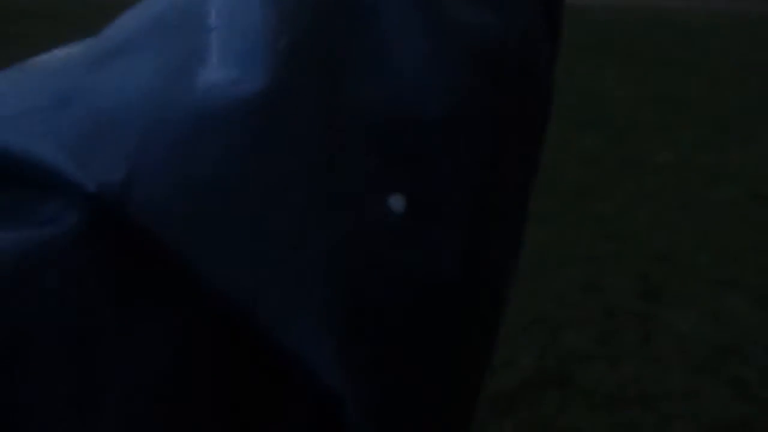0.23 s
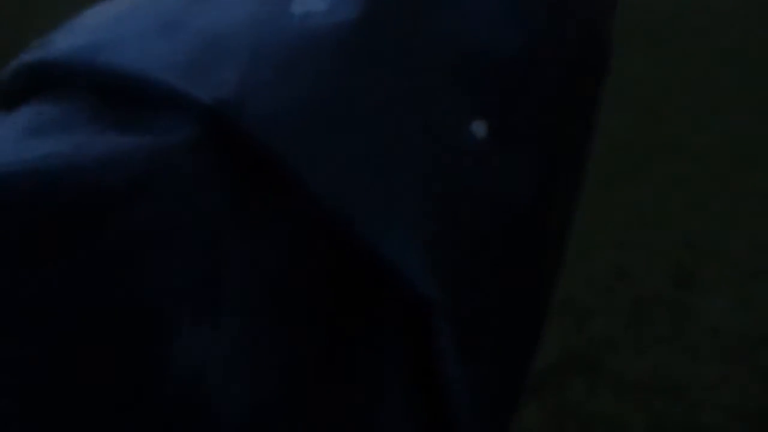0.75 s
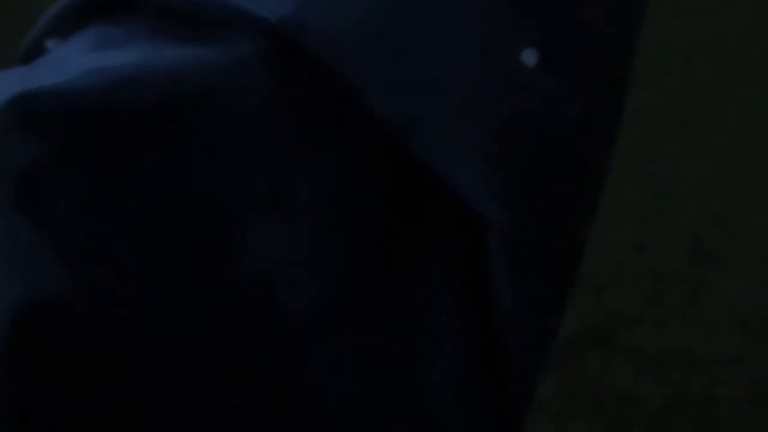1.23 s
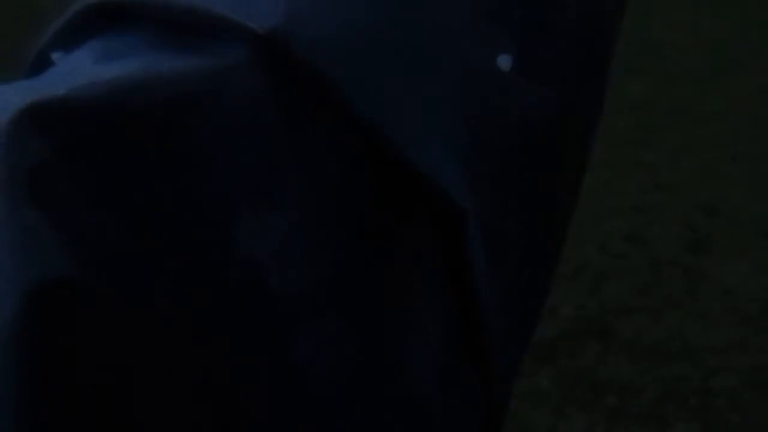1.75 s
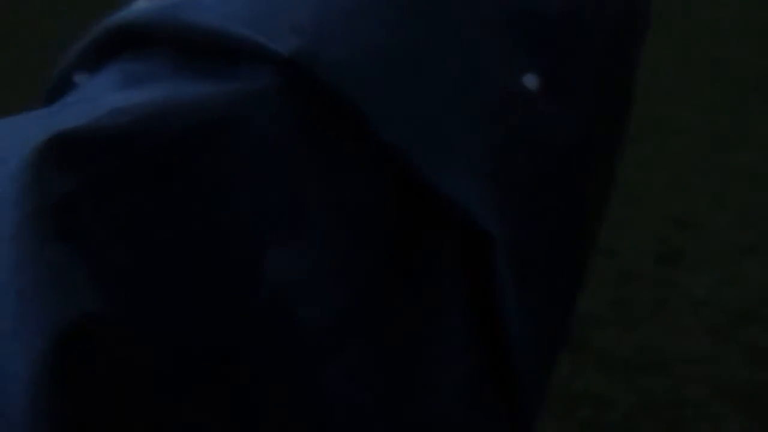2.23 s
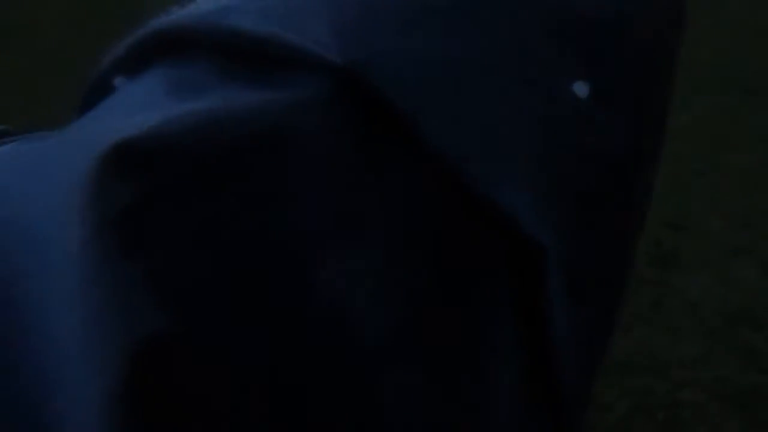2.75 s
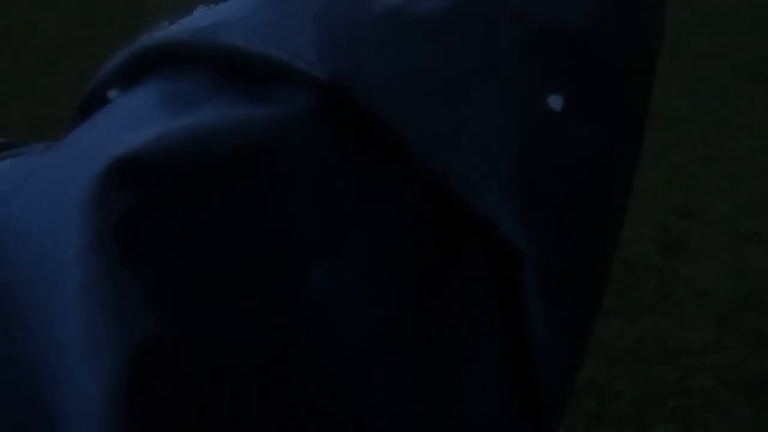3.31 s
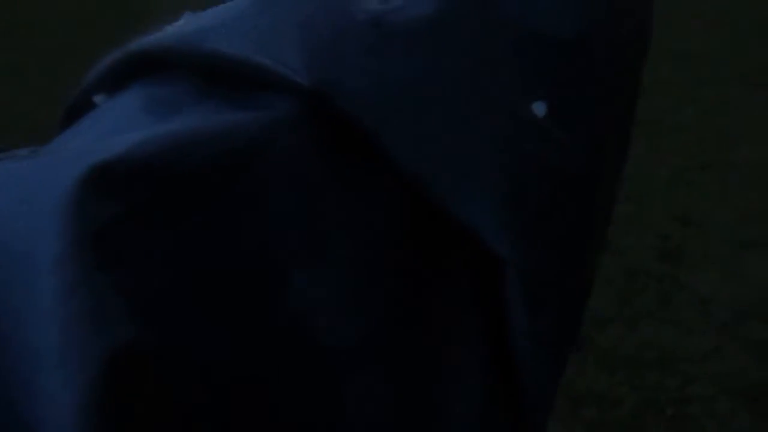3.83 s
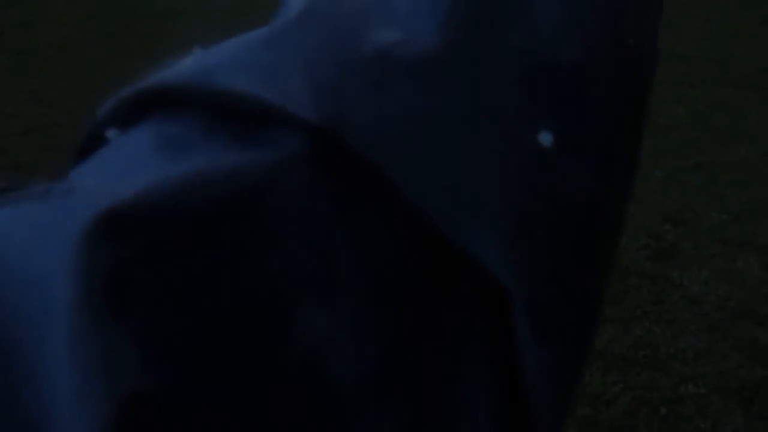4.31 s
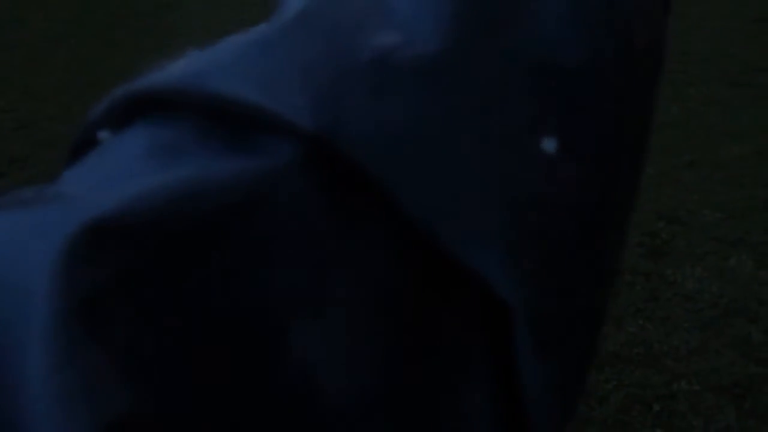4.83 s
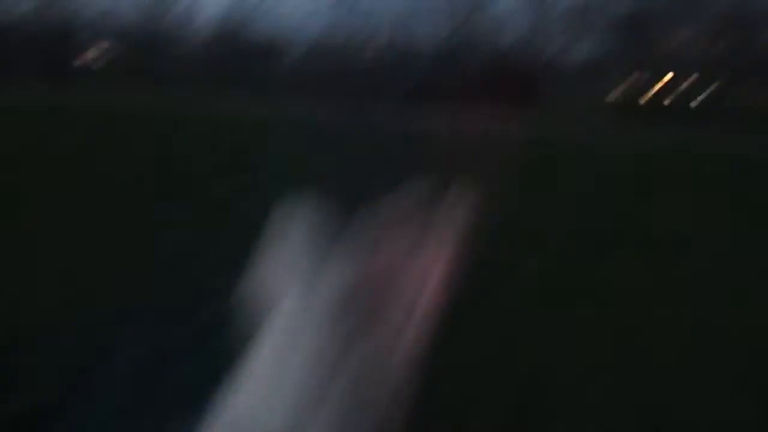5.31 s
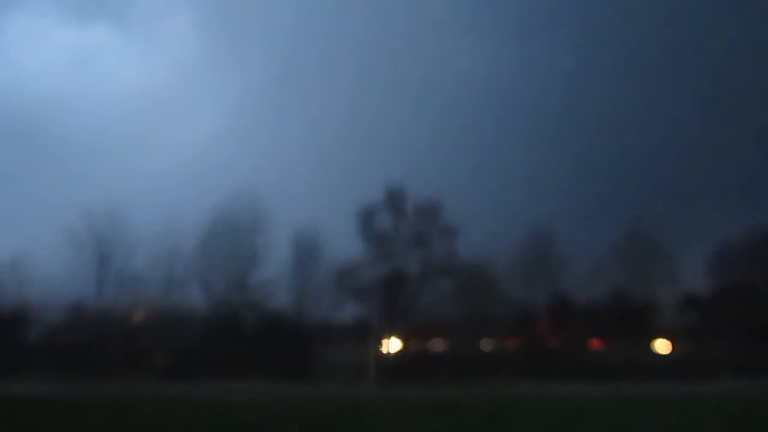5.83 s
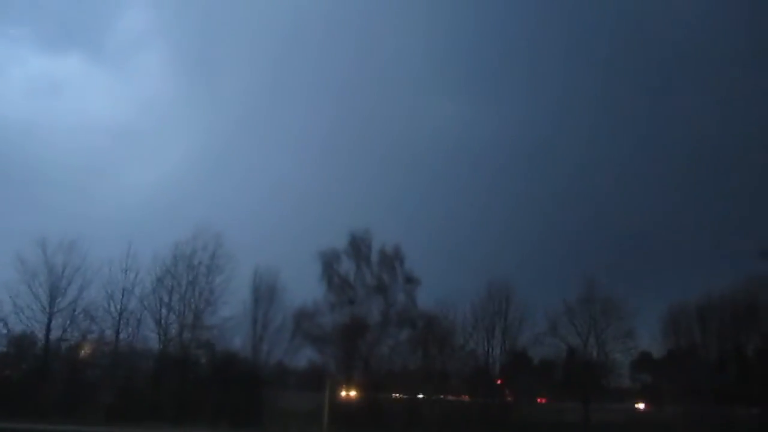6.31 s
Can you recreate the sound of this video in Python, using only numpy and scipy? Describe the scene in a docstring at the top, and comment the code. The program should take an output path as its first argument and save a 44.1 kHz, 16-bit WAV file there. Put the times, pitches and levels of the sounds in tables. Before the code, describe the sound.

Outdoors at dusk in an open field, hail and rain strike a jacket beside a handheld camera's stereo microphone. Soft taps patter irregularly; a few very loud, dry cracks stand out, one early, a tight cluster midway, another later. Beneath lie a faint rain hiss, low wind bumps and a tiny fast lens-motor ticking. The end is sparser.

```python
"""Hail clicks sharply on a jacket right beside a camera, over hissing rain, soft patter and gusty wind.
Each stone sets the cloth ringing briefly, with a noisy crack and a low thump; some also shake the camera.
Rain is coloured noise, wind is slow noise that pushes mostly opposite ways at the two microphone ports,
and a small lens motor knocks twice in each round, about ten rounds a second."""
import sys
import numpy as np
from scipy import signal
from scipy.fft import rfft, irfft
from scipy.io import wavfile
from scipy.ndimage import uniform_filter1d

SR = 44100
rng = np.random.default_rng(int(sys.argv[2]) if len(sys.argv) > 2 else 0)


def bounce(signal):
    """Save signal as a 16-bit WAV file at the path given by the first command-line argument."""
    frames = np.transpose(np.atleast_2d(signal))
    limited = np.clip(frames, -1, 1)
    pcm = np.round(limited * 32767).astype(np.int16)
    wavfile.write(sys.argv[1], SR, pcm)


N = 289560  # length [samples]


def undb(db):
    """Turn a level in dB into a gain."""
    return 10 ** (np.asarray(db) / 20)


def curve(table):
    """Draw straight lines between the rows of a timed table, giving each column one value a sample."""
    time_s, *columns = np.transpose(table)
    return [np.interp(np.arange(N) / SR, time_s, column) for column in columns]


def band(x, lo_hz, hi_hz, order=2):
    """Keep mainly the pitches between two limits."""
    sos = signal.butter(order, [lo_hz, hi_hz], "band", fs=SR, output="sos")
    return signal.sosfilt(sos, x)


def unit(x):
    """Scale to an average strength (rms) of 1."""
    return x / np.sqrt(np.mean(x ** 2))


def walk(rate_hz):
    """Random levels that slide from one to the next, rate_hz of them a second, with a spread of about 1."""
    hold = int(SR / rate_hz)
    steps = np.repeat(rng.standard_normal(N // hold + 1), hold)
    return unit(uniform_filter1d(steps, hold)[:N])


def ring(t, hz, db, t60, phase=0):
    """Sine waves that die away, one row for each way the object vibrates; t60 is the time to fall 60 dB."""
    hz, db, t60, phase = (np.reshape(v, (-1, 1)) for v in (hz, db, t60, phase))
    return undb(db) * np.sin(2 * np.pi * hz * t + phase) * 1000. ** (-t / t60)


def add(out, s, sound):
    """Mix a short sound into out, starting at s seconds."""
    i = int(s * SR)
    out[:, i:i + sound.shape[1]] += sound[:, :N - i]


def rain(level_db):
    """Far drops are so dense that they blur into a hiss, partly shared by the two ports."""
    # colour of the hiss at the right port, before a bass cut: (pitch [Hz], relative level [dB])
    colour = [(200, -30), (400, -20), (850, -4), (1150, -5), (1600, 0), (2200, -9.5), (3200, -11.5),
              (4100, -20.5), (5300, -18), (7500, -23.5), (10000, -32), (12500, -42), (14000, -52.5)]
    # how the ports share it: (pitch [Hz], left minus right [dB], likeness [0-1], left leads by [radians])
    sharing = [(300.3, 1.5, 0.8, 18), (800, 2.5, 0.5, 4.9), (1350, -4, .55, 2.5), (3040, -4, .25, 1.4),
               (5000, -1, 1, 4.9)]
    hz = np.arange(N // 2 + 1) * SR / N + 1  # the +1 keeps the logarithm finite
    db, pan_db, alike, lead = (np.interp(np.log(hz), np.log(table[0]), column)
                               for table in (np.transpose(colour), np.transpose(sharing))
                               for column in table[1:])
    alike = np.clip(alike, 0, 1)
    unsteady = undb(.8 * walk(30))
    right, other = rfft(rng.standard_normal((2, N)) * unsteady)
    left = alike * np.exp(1j * lead) * right + np.sqrt(1 - alike ** 2) * other
    left = left * undb(pan_db)
    bass_cut = np.minimum(hz / 200, 1)
    hiss = irfft(np.array([left, right]) * undb(db) * bass_cut, N)
    return unit(hiss) * undb(level_db)


def wind():
    """Eddies rumble, flutter and bump at the ports, mostly pushing one while they pull the other."""
    # strength before the random gusts below: (time [s], rumble level [dB], flutter level [dB])
    gusts = [(0, -74, -71.5), (.3, -90, -62.5), (.58, -78, -63.5), (.8, -84, -72), (1.1, -68, -68),
             (1.22, -97.5, -77.5), (1.54, -66, -76), (1.72, -84.5, -74), (1.96, -61.5, -92),
             (2.1, -84, -61), (3.05, -79.5, -63), (3.2, -78, -82), (3.42, -52.5, -49.5), (3.75, -78, -66.5),
             (4.06, -84, -86.5), (4.3, -69, -87), (5.1, -57, -66), (5.62, -88, -88), (6.1, -59, -78.5),
             (6.33, -62, -73.5), (6.57, -50, -71.5)]
    # single eddies: (time [s], peak level before the port gains [dB], middle pitch [Hz])
    puffs = [(0.21, -59.5, 300), (0.361, -61.5, 420), (0.445, -59, 354), (0.601, -69, 218),
             (0.85, -70, 237), (1.075, -65, 131), (1.998, -64, 158), (2.12, -71, 339), (2.405, -60, 261),
             (2.46, -54, 312), (2.621, -60, 420), (2.77, -56.5, 218), (2.858, -66, 280), (3.024, -58, 260),
             (3.089, -57, 324), (3.407, -51, 350), (3.759, -63, 385), (3.987, -60.5, 311.4),
             (6.248, -60.5, 253.2), (6.49, -50, 88.8)]
    rise_s, port_gains = 0.0085, [[-3], [4.88]]
    out = 0
    for db, lo_hz, hi_hz in zip(curve(gusts), (40, 150), (160, 420)):
        shared, own = unit(band(rng.standard_normal((2, N)), lo_hz, hi_hz))
        bumps_db = 5.0 * walk(45) + 3.0 * walk(12)
        out = out + undb(db + bumps_db) * np.array([-.75 * shared + .2 * own, shared])
    age = np.arange(3000) / SR / rise_s
    for s, peak_db, hz in puffs:
        bump = band(rng.standard_normal(len(age)), .7 * hz, 1.4 * hz) * age * np.exp(-age)
        add(out, s, undb(peak_db) * bump / abs(bump).max() * port_gains)
    return out


def motor(level_db):
    """The lens motor knocks twice a round; the casing rings and carries each knock to both ports."""
    # loudness on top of level_db: (time [s], first tick level [dB], second tick level [dB])
    ticks = [(0, 12, 11), (1, 21.5, 0), (2, 20.5, 8), (3.4, 22.5, 2), (4, 16, -6.5), (5.25, 17, -2.5),
             (5.4, -11.5, -5.5), (5.7, -6.5, 14), (6.57, -10, 16)]
    # ringing of the casing: (pitch [Hz], level [dB], t60 [s], left leads by [radians])
    casing = [(860, 3.5, 0.045, 3.1), (470, -11.5, 0.0097, 1), (1150, 4, .011, 2.2), (1390, -1, .008, 1.6)]
    round_s, first_s, second_s = .1001, .0945, .0275  # time between rounds, start of each tick series
    out, t = np.zeros((2, N)), np.arange(1500) / SR
    hz, db, t60, lead = np.transpose(casing)
    soft_start = 1 - np.exp(-t / 0.00094)
    for start, tick_db in zip((first_s, second_s), curve(ticks)):
        for s in np.arange(start, N / SR - .01, round_s):
            chance = rng.standard_normal((2, len(hz)))  # no two knocks are quite alike
            modes = hz * (1 + .015 * chance[0]), db + 2.5 * chance[1], t60
            left, right = ring(t, *modes, lead).sum(0), 1.2 * ring(t, *modes).sum(0)
            add(out, s, undb(tick_db[int(s * SR)]) * soft_start * np.array([left, right]))
    return out * undb(level_db)


def patter(level_db, count=480, size=80):
    """Raindrops tap the cloth softly: some at set times, fainter ones at random on a stock of random folds."""
    # drops that stand out: (time [s], level of the tap [dB], middle of the ring [Hz])
    drops = [(.071, -39, 1450), (0.11, -36, 1710), (0.168, -42, 1320), (0.208, -44, 1240),
             (.396, -42, 1410), (0.4258, -37, 1430), (.477, -38, 1300), (.542, -39, 1530),
             (.617, -37.5, 1560), (.704, -45, 1080), (1.026, -36, 1240), (1.064, -44, 1530),
             (1.13, -36.5, 1310), (1.156, -44, 900), (1.2353, -33.5, 1380), (1.254, -39, 1940),
             (1.276, -44, 1250), (1.388, -36, 1700), (1.5267, -34.5, 1400), (1.613, -40.5, 1570),
             (1.857, -39.5, 1610), (1.8848, -42, 1630), (1.951, -37.5, 1550), (1.969, -37, 1640),
             (2.034, -42, 1510), (2.047, -41.5, 1520), (2.1062, -36, 1110), (2.2473, -43, 1500),
             (2.33, -41.5, 1250), (2.373, -35, 1530), (2.517, -39, 1360), (2.529, -33.5, 1390),
             (2.7062, -36, 1470), (2.856, -33.5, 1400), (2.876, -37, 1510), (2.895, -38.5, 1410),
             (3.045, -42, 1360), (3.14, -44, 1600), (3.355, -39, 1470), (3.729, -46, 1720),
             (3.777, -41, 1610), (3.969, -46, 1640), (4.015, -44.5, 1128), (4.449, -44, 1256),
             (4.656, -42, 1370), (4.769, -44, 1660), (4.89, -48.5, 1900), (4.904, -45.5, 1440),
             (5.052, -46, 1330), (5.164, -42.5, 1000), (5.232, -42.5, 1780), (5.3195, -38, 1630),
             (5.468, -43, 1260), (5.448, -50, 1700), (5.886, -43.5, 1385), (6.1846, -57, 3000),
             (6.543, -45, 1275)]
    out = np.zeros((2, N))
    for s, peak_db, centre_hz in drops:
        add(out, s, undb(peak_db) * blow(centre_hz, -27.5, 10.9, -9.0))
    folds = [blow(1000 * 2 ** (0.88 * pitch), -26.5, 4 + 9 * length, -4.5)
             for pitch, length in rng.random((size, 2))]
    for when, luck, which in rng.random((count, 3)):
        drop_db = level_db[int(when * N)] + 13.5 - 1.9 * np.log(luck)  # a few drops are much louder
        add(out, when * N / SR, undb(drop_db) * folds[int(which * size)])
    return out


def thump(t):
    """A low knock made of two short rings, opposite at the two ports."""
    knock = ring(t, [130, 240], [-2, 0], [.02, .013]).sum(0)
    return band(knock, 120, 510) * [[-.75], [1]]


def blow(centre_hz, crack_db, t60_ms, pan_db):
    """A hit rings the cloth, cracks and thumps; the cloth's ring reaches the left port late and reversed."""
    # ways the cloth can ring: (pitch [Hz], level [dB], share of the limited ring time [ratio])
    cloth = [(521.8, -16, 0.43), (840, -11, 2.2), (1374, -2, 1.6), (1630, 5, 1.3), (2024, 10.5, 0.52),
             (2877, 6.5, 1.6), (5120, -14, 0.74)]
    t = np.arange(1300) / SR
    hz, db, share = np.transpose(cloth)
    chance, noise = rng.standard_normal((3, len(hz))), rng.standard_normal((4, len(t)))
    hz = hz * (1 + .05 * chance[0])
    db = db - 13.0 * np.log2(hz / centre_hz) ** 2 + 1.5 * chance[1]  # favour pitches near the middle
    t60 = max(t60_ms, 1) / 1000
    damped = share * min(.6 * t60, .008)
    right = ring(t, hz, db, damped).sum(0)
    delay_phase = 2 * np.pi * hz * 7e-5  # 70 microseconds late
    left = -ring(t, hz, db, damped, 0.3 * chance[2] - delay_phase).sum(0)

    # a hard landing starts with one sharp contact; then comes a rattle that swells and dies
    age = t / (.07 * t60)
    settling = undb(-22.5) * 1000. ** (-t / np.clip(5.3 * t60, .02, .04))  # the cloth shivers on, faintly
    rattle_shape = age * np.exp(1 - age) + settling
    hard = min(undb(crack_db + 14), 1)
    rattle_noise = noise[0] + 0.49 * noise[:2]  # mostly the same at both ports
    rattle = 12.7 * t60 * (1 - 0.55 * hard) * rattle_noise * rattle_shape
    rattle[:, 0] += hard

    # the duller the crack, the softer the landing and the less treble reaches the cloth
    body = signal.fftconvolve([left, right], rattle, axes=1)[:, :len(t)]
    body = band(body, 730, 7000 * undb(0.39 * min(crack_db, 0)))
    body = band(body, 480, 15000)  # the cloth sends out little bass
    crack = band(noise[2:] * 1000. ** (-t / (0.28 * t60)), 3500, 6400)
    both = body / abs(body).max(1, keepdims=True)
    both = both + undb(crack_db + 3.5) * crack / abs(crack).max()
    pan = undb(np.minimum([[pan_db], [-pan_db]], 0))  # only the weaker side is turned down
    return pan * both + undb(-36.5) * thump(t)


def hail():
    """Stones hit the cloth, and some also make the camera body ring and thump."""
    # hits: (time [s], level of the blow [dB], middle of the ring [Hz], crack level before a 3.5 dB lift [dB],
    # length setting that scales the ring and rattle times [ms], left minus right [dB])
    stones = [(.0563, -36.5, 1640, -8.5, 4, -6), (0.4509, -43.5, 740, 0, 46, -11),
              (.5778, -36.5, 1530, -10, 18, -11), (.7887, -40.5, 1790, -3.5, 126, -4),
              (0.7974, -28.5, 2480, -8.5, 22, -6), (0.8237, -20, 1620, -7.5, 15, -12.5),
              (0.9142, -33, 1490, -33, 2.1, -14), (0.9657, -14.5, 1280, -29.5, 7.7, -6),
              (0.9982, -35, 1240, -6.5, 12, -10), (1.2116, -32.5, 1480, -31, 5.5, -30),
              (1.3244, -30, 1450, -28, 24, -10), (1.3596, -32.5, 1480, -4, 23, -6),
              (1.4125, -0.5, 1800, -11, 8.6, -8), (1.4932, -13, 1380, -28, 24.6, -2.5),
              (1.622, -50, 1320, -2, 12, -4), (1.645, -36, 1610, -17, 23, -11),
              (1.7713, -42, 1710, -6.5, 11, -10), (2.6172, -32.5, 1430, -34, 8.5, -6.5),
              (2.7149, -53, 1250, 0, 20, -10), (3.1726, -33, 1750, -10.5, 17, -9),
              (3.199, -28, 1110, -10.5, 23.4, -7.5), (3.2634, -22, 1480, -23.5, 10.5, -5),
              (3.3099, -49, 1360, -9, 4, 17), (3.3955, -44, 1030, -19, 12, -17),
              (3.4776, 2.5, 1301, -15, 11.8, -8.5), (3.5023, -0.5, 850, -9, 8.7, -6.5),
              (3.5697, -33, 1880, -10, 4.4, -18), (3.5893, -41, 1960, -4.5, 18, -15),
              (3.616, -16, 1690, -7.5, 12.4, -7.5), (3.6515, 0.5, 1750, -8, 9.4, -6),
              (3.6697, -16, 1540, -25, 3.9, 5), (3.8353, -23.5, 1880, -17, 2.9, -1),
              (3.955, -35, 2055, -2.5, 1.9, -10.5), (4.1058, -40, 1120, -21, 21.4, -10),
              (4.363, -19.5, 1900, -20.5, 3.3, -11.5), (4.549, -36.5, 977, -37, 7.7, 26.5),
              (4.58, -47.5, 1670, -8, 8.4, -17), (4.689, -39, 2020, 1, 1.95, -12),
              (4.9647, -52, 1620, -1.5, 16.5, -10), (5.1824, 2, 2300, -4, 12.2, -11.5),
              (5.2587, -31.5, 2090, 0.5, 13, -14), (6.0202, -40, 970, -39, 12, -14.5),
              (6.2146, -20, 2170, -8, 9.3, 3.5), (6.2579, -19, 1370, -25.5, 21.4, -4)]
    # camera body, three metal rings then two hollow knocks of the casing:
    # (pitch [Hz], t60 [s], share at the left port [ratio], left leads by [radians])
    metal = [(2864, .24, .32, 2.1), (2318, .2, .57, 2.8), (2010, .1, .5, 2.5), (330, .04, .6, 3.1),
             (520, .035, .6, 3.1)]
    # shakes of the body: (time [s], thump level [dB], then the level of each of its five rings [dB])
    shakes = [(1.4137, -25, -62, -82, -44.5, -55, -55), (3.48, -38, -49, -62, -63, -34, -27),
              (3.503, -12.5, -51, -57, -61, -30, -36), (3.6162, -60, -80, -80, -49, -60, -55),
              (3.651, -50.5, -43.5, -44, -60, -42, -36), (4.3637, -28.5, -79, -75, -80.5, -63, -60),
              (4.5517, -35.5, -80, -81.5, -80.5, -67, -62), (4.688, -36.5, -80, -78, -80, -65, -60),
              (5.183, -27, -45.5, -53, -60, -15.5, -18), (6.02, -30.5, -80, -82, -80, -60, -56)]
    out, t = np.zeros((2, N)), np.arange(SR // 2) / SR
    for s, peak_db, *how in stones:
        add(out, s, undb(peak_db) * blow(*how))
    hz, t60, left_share, lead = np.transpose(metal)
    for s, thump_db, *db in shakes:
        left = left_share @ ring(t, hz, db, t60, lead)
        right = ring(t, hz, db, t60).sum(0)
        add(out, s, np.array([left, right]) + undb(thump_db) * thump(t))
    return out


def scene():
    """Add up everything that reaches the two ports."""
    # recording level of the rain, the random patter and the motor, sinking after the loudest blows
    # and creeping back: (time [s], level [dB])
    background_level = [(0, -67.5), (.5, -66), (1.4, -61), (1.47, -67.5), (3.46, -60), (3.7, -72.5),
                        (5.17, -69), (5.22, -71), (6.57, -66.5)]
    level_db, = curve(background_level)
    return hail() + patter(level_db) + rain(level_db) + motor(level_db) + wind()


def record(dry):
    """Flatten any peaks beyond full scale, then cut the treble above 16900 Hz steeply."""
    treble_cut = signal.ellip(8, .2, 70, 16900, fs=SR, output="sos")
    return signal.sosfilt(treble_cut, np.clip(dry, -1, 1))


dry = scene()
out = record(dry)
bounce(out)
```